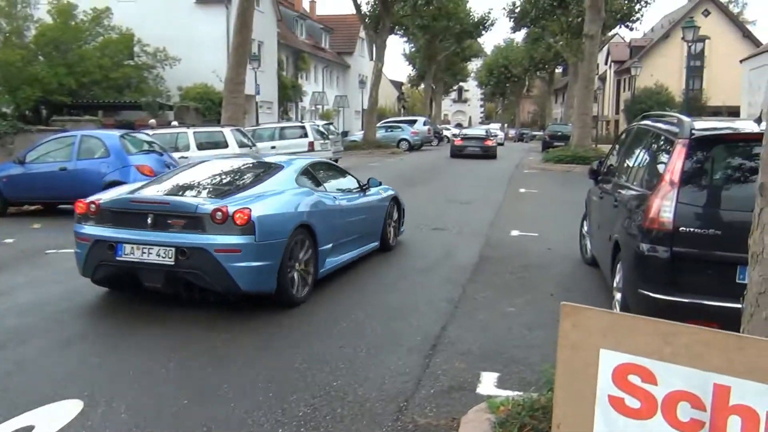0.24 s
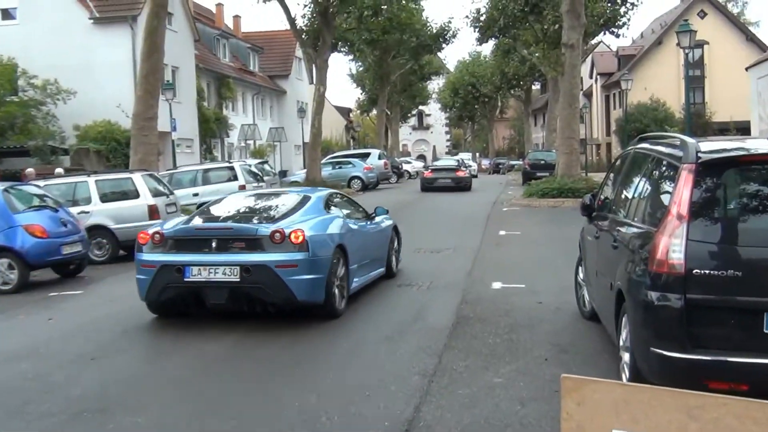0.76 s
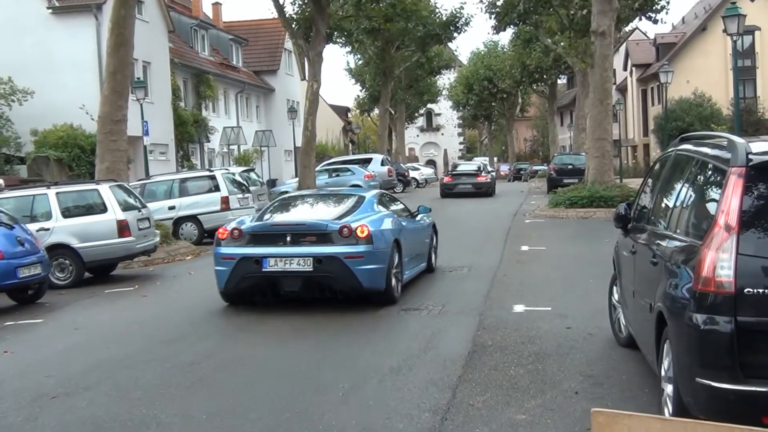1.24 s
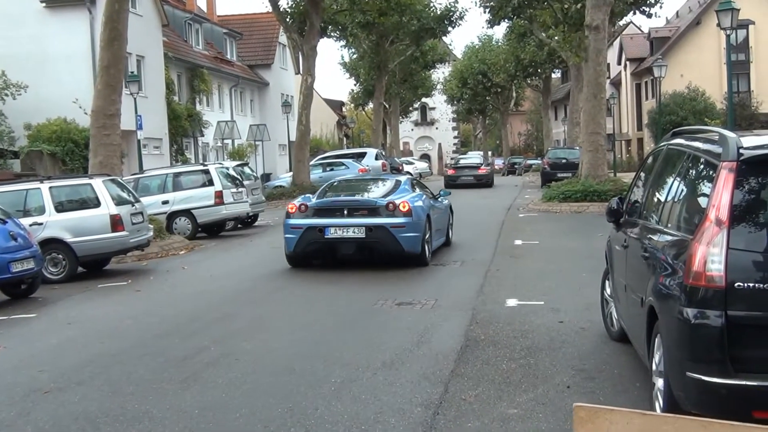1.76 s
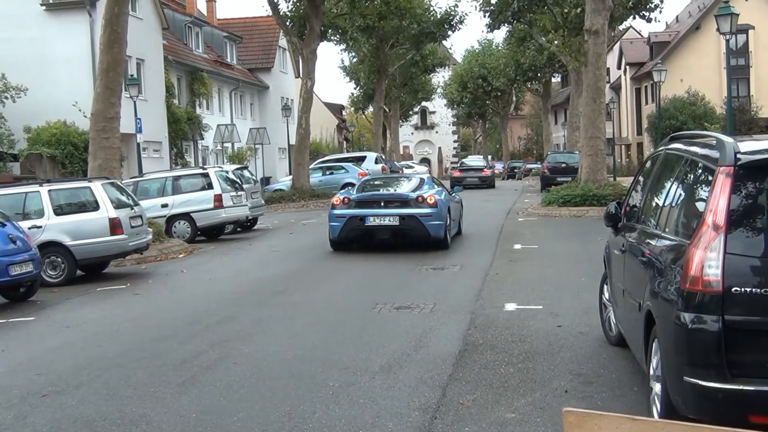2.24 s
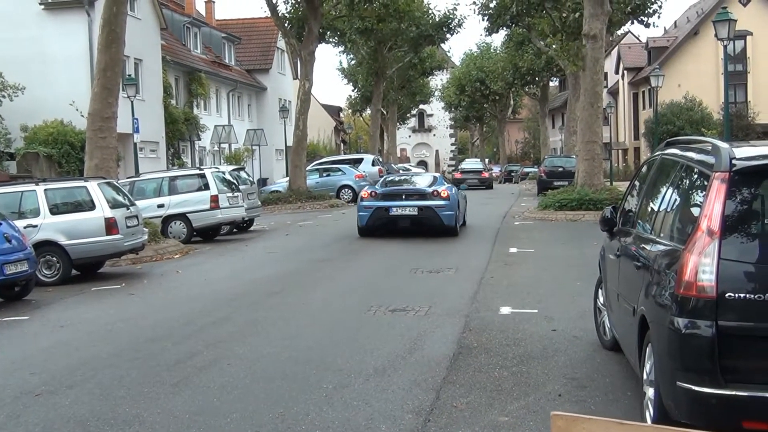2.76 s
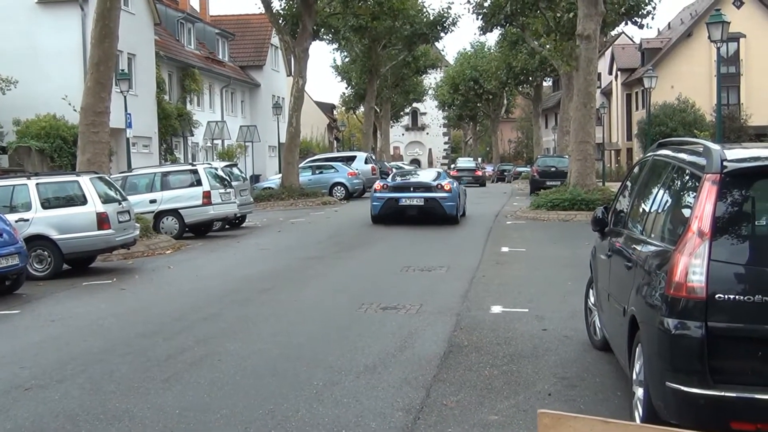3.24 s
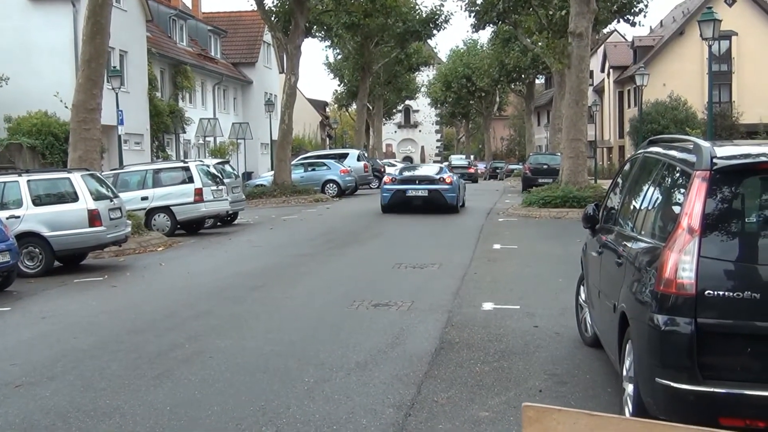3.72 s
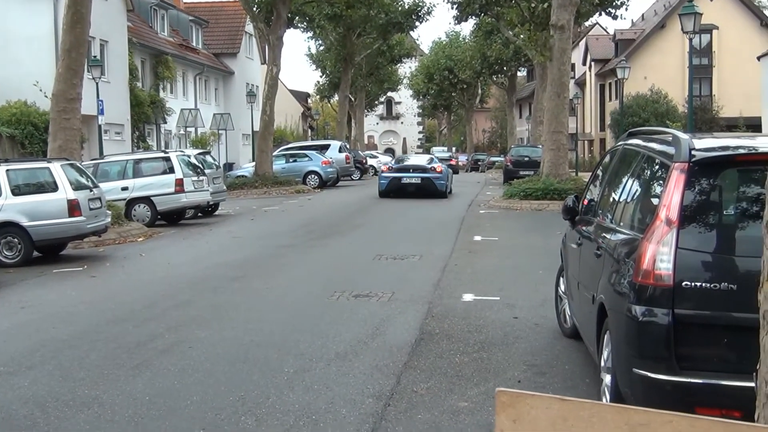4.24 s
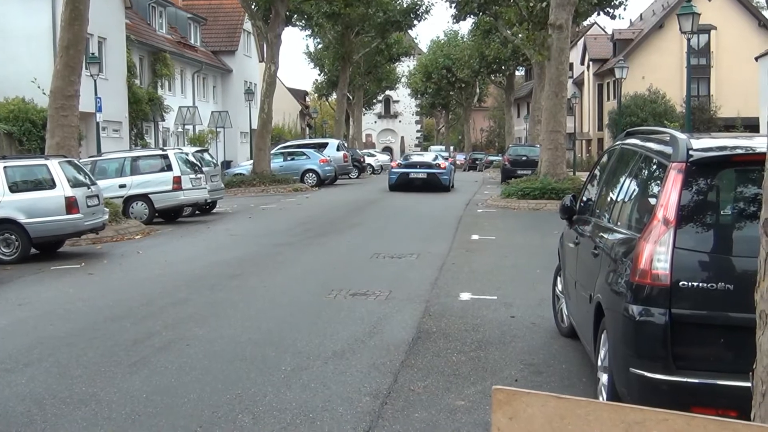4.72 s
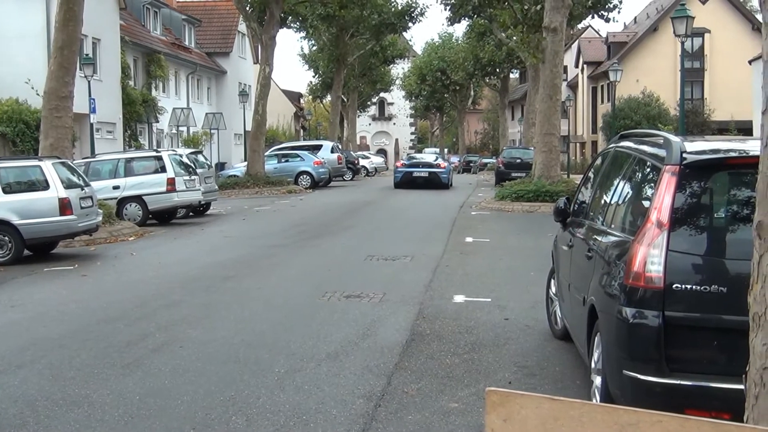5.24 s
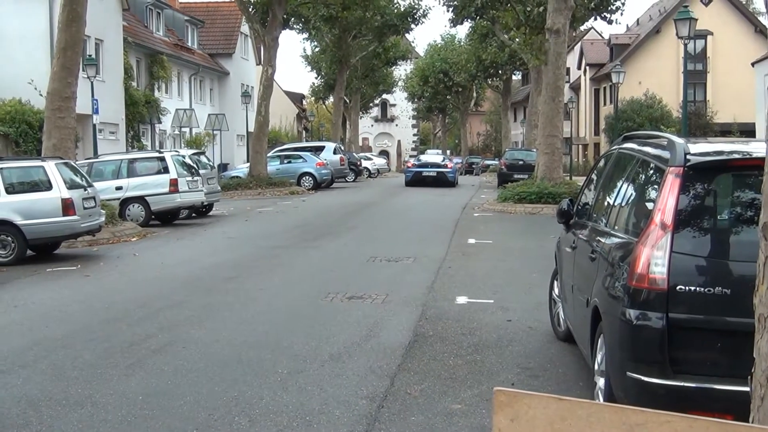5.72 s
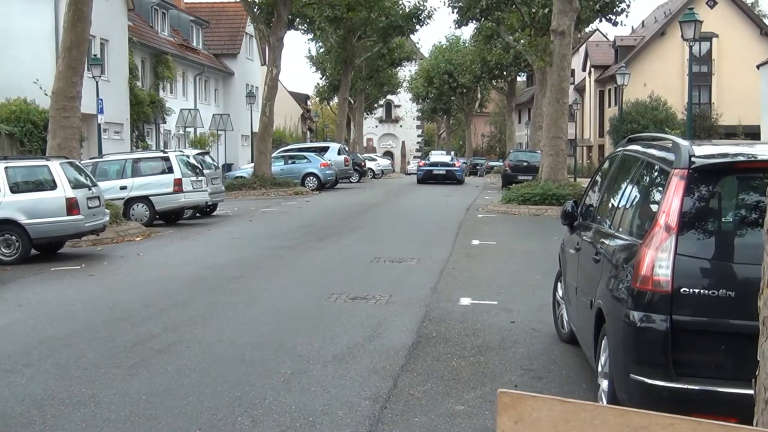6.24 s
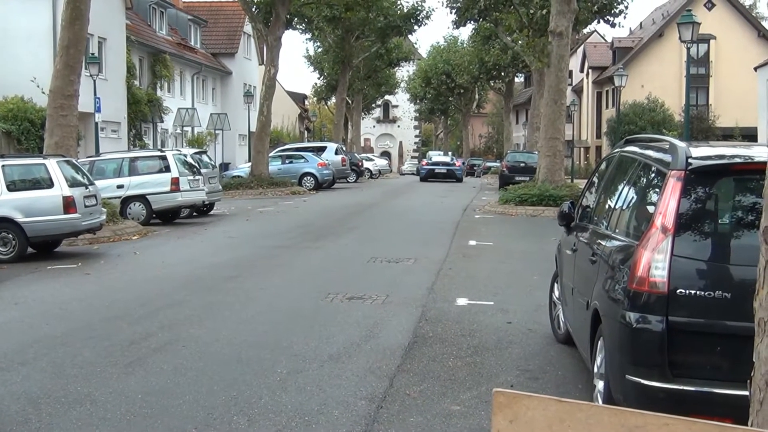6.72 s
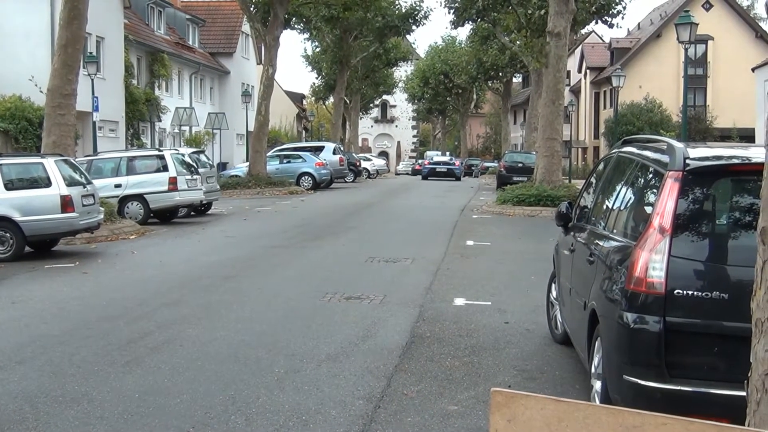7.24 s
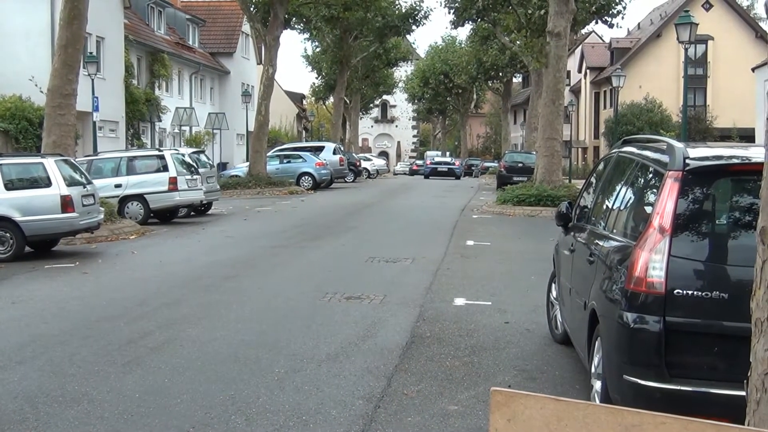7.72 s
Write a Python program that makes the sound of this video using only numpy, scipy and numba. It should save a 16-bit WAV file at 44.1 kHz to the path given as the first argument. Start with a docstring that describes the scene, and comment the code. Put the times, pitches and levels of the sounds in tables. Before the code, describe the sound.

A sports car pulls away down a street, its low engine growl rising, stumbling through a gear change, then climbing to a steady, popping drone.

```python
"""A sports car pulls away down a street while a second engine ahead revs and dies away, both sums of crank orders.
The car's orders rise, stumble through a gear change amid puffs of shaped noise, then climb to a steady drone.
Pipe pops, a swelling hum and a noise-fed resonance come and go; late on, gliding tones make a sparrow chirp.
Throughout, filtered noise gives tyre and traffic roar, and delay lines echo the engines off the house fronts."""
import sys
import numpy as np
from scipy import signal
from scipy.fft import rfft, irfft
from scipy.io import wavfile
from scipy.ndimage import uniform_filter1d
from numba import njit

SR = 44100
rng = np.random.default_rng(int(sys.argv[2]) if len(sys.argv) > 2 else 0)


def volts_from_decibels(level):
    """Turn decibel levels (scalar or array-like) into linear amplitude factors."""
    exponent = np.asarray(level, float) / 20
    return 10 ** exponent


def digitize_waveform(pressure):
    """Quantize a signal to 16-bit integers and store it at the path in sys.argv[1].

    Rows of a 2-D input are taken as channels; values are limited to [-1, 1].
    """
    field = np.atleast_2d(pressure).T
    bounded = np.clip(field, -1, 1)
    quanta = np.round(bounded * 32767).astype(np.int16)
    wavfile.write(sys.argv[1], SR, quanta)


N = 351918
TIME = np.arange(N) / SR

# The car's speed and load; the load drops and catches twice in the gear change:
# (time [s], crank frequency [Hz], load offset of order 2 [dB])
CAR_SPEED_LOAD = [(0, 60.26, 0.5), (.165, 61.33, 2), (.54, 62.42, .5), (1.04, 65.82, 0), (1.54, 69.92, 1),
                  (2.04, 74.44, 0.5), (2.54, 78, 0.5), (2.8, 76.24, 0), (2.83, 75.85, -4),
                  (2.878, 75.8, -5), (2.93, 66.05, -7), (2.996, 62.8, -10), (3.05, 55.5, -8.5),
                  (3.09, 57.2, -9), (3.154, 59.5, 1.5), (3.198, 58.15, -3.5), (3.252, 51.87, 4),
                  (3.308, 50.1, -10), (3.4, 50.9, -2), (3.5, 51.37, -2), (3.875, 52.85, 3),
                  (4.375, 55.46, -1), (5, 58.17, -1), (5.5, 60.07, -1), (6, 62.43, 1.5), (6.5, 63.9, -.5),
                  (6.9, 63.87, 1), (7.5, 63.22, -1), (7.98, 63.15, -2)]
# Level of each crank order against engine speed: (crank frequency [Hz], order 1 [dB], .., order 6 [dB])
ORDER_LEVELS = [(52.5, -49, -22.5, -20, -22.5, -46, -34.5), (52.6, -61, -25.5, -22, -23, -44, -37),
                (53.67, -55, -17.5, -34.5, -20, -45, -37), (56.3, -34.5, -10, -34, -23.5, -38, -33),
                (57.03, -33, -9, -19.5, -28, -46, -36), (59.13, -38.5, -17, -27, -23.5, -39, -35.5),
                (59.66, -30, -13.5, -16, -24.5, -30, -45), (61.3, -32, -13, -31, -32, -30, -37),
                (62.4, -37, -11.5, -35, -34.5, -27, -29.5), (65, -36, -10, -38.5, -33, -27.5, -28.5),
                (65.9, -34, -9, -28, -27, -25.5, -26.5), (68.4, -37.5, -10.5, -38, -25, -27, -28),
                (70.9, -31.5, -9, -32.5, -24.5, -25, -39.5), (72.8, -36, -8, -30, -23, -30, -40),
                (76.6, -30.5, -8.5, -24, -30.5, -33.5, -39), (78, -33, -8.5, -25, -30.5, -46, -30)]
# Orders other than the second while the clutch is open: {order: level [dB]}
OPEN_CLUTCH_LEVELS = {1: -44, 3: -25, 4: -29, 5: -40.5, 6: -36.5}
# Exhaust resonances that lift an upper order as it crosses them:
# (frequency [Hz], width [Hz], level over the upper orders' level [dB])
EXHAUST_RESONANCES = [(456.5, 18, 6), (609.7, 30, 0), (679.5, 20, -1.5), (741, 34, 0.5), (847.6, 30, -0.5),
                      (1000, 20, 0), (1136, 64, -3.5)]
# Loudest moments of single upper orders: (time [s], order, peak level [dB], length [s])
ORDER_SWELLS = [(.35, 12, -45, .44), (0.56, 10, -34.5, 0.14), (.921, 7, -39.5, .3), (1.08, 13, -34.5, 0.23),
                (2.4, 10, -42, 0.3), (2.447, 13, -43.5, 0.25), (2.706, 8, -41, 0.12), (2.734, 9, -39, .18),
                (2.742, 10, -39, 0.15), (3.456, 8, -37, .5), (4.408, 15, -38, 0.42),
                (4.784, 8, -33.5, 0.077), (5.33, 14, -28.5, 0.35), (5.756, 14, -38, 0.26),
                (6.194, 11, -39.5, .24), (7.597, 11, -38.5, 0.32)]
# Course of the broad layers: (time [s], upper orders [dB], road roar [dB], gas hiss [dB])
LAYER_LEVELS = [(0, -43, -34.5, -41.5), (.93, -46, -36.5, -45.5), (1.35, -48, -40.5, -50),
                (1.9, -47, -40.5, -51), (2.55, -53, -40.5, -52), (2.76, -46, -38, -51),
                (3.07, -49.5, -40.5, -52), (3.5, -53, -41.5, -53), (4.3, -45, -37, -51), (5, -46, -34, -54),
                (5.55, -41, -31, -56.5), (6.1, -41.5, -34.5, -65.5), (6.9, -43.5, -36, -58),
                (7.5, -43, -34, -61), (7.98, -40.5, -33.5, -56)]
# Shape of the gas hiss, scaled as a whole later: (frequency [Hz], relative density [dB per Hz])
HISS_SPECTRUM = [(1470, -29.5), (2500, -7.5), (2720, -6), (3030, 0.5), (3470, 3), (5530, -5.5),
                 (8680, -8.5), (15500, -31.5)]
# Dull exhaust pops: (time [s], peak level [dB], frequency [Hz])
EXHAUST_POPS = [(.471, -20, 905.5), (4.318, -16.5, 850), (4.362, -15, 799.3), (4.871, -13.5, 1078),
                (4.907, -12.5, 1047), (4.932, -16, 750), (5.534, -12, 1000), (5.572, -15, 1300),
                (5.601, -15, 903), (5.614, -14, 796), (5.675, -14, 854), (7.018, -10.5, 950),
                (7.034, -10.5, 950)]
# Gearbox air: (time [s], level before shaping [dB], centre [Hz], time to fall 60 dB [s])
AIR_PUFFS = [(2.825, -54, 8333, 0.087), (.76, -41.5, 5313, 0.34), (3.144, -45.5, 6000, 0.16),
             (3.158, -40, 3410, 0.35), (3.266, -52, 11100, .08), (3.324, -57, 10510, .04),
             (5.02, -63, 9370, 0.047)]
# The engine ahead revs and lifts off: (time [s], crank frequency [Hz], reference level [dB])
AHEAD_SPEED_LEVEL = [(0.03, 52.96, -20), (0.13, 54.8, -15.5), (0.33, 57, -16.5), (0.55, 61.3, -19.5),
                     (0.73, 60.75, -17.5), (0.93, 54.9, -25)]
# Its orders: {order: level beside the reference [dB]}
AHEAD_ORDER_LEVELS = {2: -7.5, 3: -12.5, 4: -1.5, 6: -16.5, 12: -19}
# Swelling hum: (peak time [s], length [s], frequency [Hz], level [dB], fourth multiple [dB])
HUM_SWELLS = [(3.8, .9, 68.5, -30, -48.5), (7.748, .7, 67.9, -28, -29.5)]
# Shape of the road roar, scaled as a whole later: (frequency [Hz], relative density [dB per Hz])
ROAR_SPECTRUM = [(30, -45), (45, -28.5), (70, -15.5), (100, -17), (160, -10.5), (250, -14), (400, -17),
                 (540, -25), (800, -23), (1300, -26.5), (2100, -30), (4000, -45), (8500, -57),
                 (15000, -78.5)]
# Tailpipe resonances in the gas noise: (frequency [Hz], width [Hz], gain [dB])
TAILPIPE_RESONANCES = [(659, 88, 1), (855, 37, -5), (390.6, 21, -0.5), (950, 99, -4)]
# Course of the narrow drone, before a fixed trim: (time [s], level [dB])
DRONE_LEVELS = [(0.0, -38), (0.66, -31.5), (0.93, -28), (1.38, -49.5), (2.78, -28.5), (3.11, -50),
                (3.2, -36), (3.73, -41.5), (3.93, -32), (4.02, -39), (4.82, -29.5), (4.89, -51),
                (4.95, -29), (5.51, -44), (5.91, -17.5), (6.07, -33.5), (7.2, -36), (7.42, -21.5),
                (7.56, -42), (7.98, -46)]
# Sparrow: (time [s], level before the burr [dB], start pitch [Hz], end pitch [Hz], length [s])
SPARROW_CHIRPS = [(6.499, -41.5, 5413, 4287, 0.074), (7.009, -46, 4800, 4540, 0.049),
                  (7.449, -43, 4234, 4594, 0.08)]


def columns(table):
    """Linear interpolation gives every column a value per sample."""
    s, *values = np.transpose(table)
    return [np.interp(TIME, s, v) for v in values]


def unit(x):
    """Normalisation by the root mean square: rms becomes 1."""
    return x / np.sqrt(np.mean(x ** 2))


def band(x, hz, width):
    """Two-pole resonance with gain 1 at its centre."""
    return signal.lfilter(*signal.iirpeak(min(hz, 18000), hz / width, fs=SR), x)


def walk(rate):
    """Smoothed random process: levels held 1 / rate s and slewed twice, spread near 1."""
    hold = int(SR / rate)
    steps = np.repeat(rng.standard_normal(N // hold + 1), hold)
    return 1.17 * uniform_filter1d(uniform_filter1d(steps, hold), hold)[:N]


def noise(spectrum, flicker_db):
    """Spectral shaping of white noise, its overlapping octave bands each flickering alone."""
    hz, db = np.transpose(spectrum)
    bins = np.arange(N // 2 + 1) * SR / N + 1
    shape_db = np.interp(np.log(bins), np.log(hz), db, left=-90, right=-120)
    shaped = rfft(rng.standard_normal(N)) * volts_from_decibels(shape_db)
    out = 0
    for octave in np.arange(5, 15):  # centres at 2 ** octave Hz
        share = np.cos(np.pi / 2 * np.clip(np.log2(bins) - octave, -1, 1)) ** 2
        out = out + volts_from_decibels(flicker_db * walk(14)) * irfft(shaped * share, N)
    return out


def orders(hz, multiples, dbs, waver_db, jitter):
    """Additive synthesis by crank order; uneven firing shakes level and phase, more phase in high orders."""
    turn = 2 * np.pi * np.cumsum(hz) / SR
    out = 0
    for k, db in zip(multiples, dbs):
        level = np.sqrt(2) * volts_from_decibels(db + waver_db * walk(25))  # db is an rms level
        phase = k * turn + rng.uniform(0, 2 * np.pi) + jitter * k * walk(30)
        out = out + level * np.sin(phase)
    return out


def low_orders(hz, load_db, stumble):
    """Forced vibration: engine speed sets six low orders, load shifts the second, an open clutch the rest."""
    speed_hz, *maps = np.transpose(ORDER_LEVELS)
    dbs = []
    for k, level_db in enumerate(maps, start=1):
        db = np.interp(hz, speed_hz, level_db)
        if k == 2:
            db = db + load_db
        else:
            db = (1 - stumble) * db + stumble * OPEN_CLUTCH_LEVELS[k]
            db = db + (1.4 + 2 * stumble) * walk(16)
        if k in (3, 5):
            db = db - 0.5 * (TIME - 3)  # thins by 0.5 dB per s as the car draws away
        dbs.append(db)
    return orders(hz, range(1, 7), dbs, waver_db=.5 + 1.5 * stumble, jitter=.01 + .2 * stumble)


def upper_orders(hz, upper_db, stumble):
    """Resonant excitation: orders 7 to 18 swell as they cross exhaust resonances and at moments of their own."""
    dbs = []
    for order in range(7, 19):
        lift = sum(volts_from_decibels(db) / (1 + (2 * (order * hz - ring_hz) / width) ** 2)
                   for ring_hz, width, db in EXHAUST_RESONANCES)
        gain = volts_from_decibels(upper_db + 3.63 * walk(2.515)) * (volts_from_decibels(-1.6 * (order - 5.5)) + lift)
        for s, ringing_order, db, length in ORDER_SWELLS:
            if round(ringing_order) == order:
                gain = gain + volts_from_decibels(db) * np.exp(-2 * ((TIME - s) / length) ** 2)
        dbs.append(20 * np.log10(gain))
    # the further the sound travels, the more the air and the echoes fray it
    return orders(hz, range(7, 19), dbs, waver_db=1 + .3 * TIME, jitter=.01 + .007 * TIME + .1 * stumble)


def sports_car(upper_db, hiss_db):
    """Harmonic superposition of crank orders, with gas noise amplitude-modulated twice per crank turn."""
    hz, load_db = columns(CAR_SPEED_LOAD)
    # firings stumble while the clutch is open
    stumble = np.exp(-((TIME - 3.05) / 0.31) ** 4)
    low = low_orders(hz, load_db, stumble)
    upper = upper_orders(hz, upper_db, stumble)
    beat = 1 + 0.041 * np.sin(2 * 2 * np.pi * np.cumsum(hz) / SR)
    hiss = volts_from_decibels(hiss_db) * unit(beat * noise(HISS_SPECTRUM, flicker_db=.4))
    return low + upper + hiss


def pops():
    """Damped free oscillation: a sudden pressure step rings the pipe end for a few cycles."""
    out = np.zeros(N)
    t = TIME[:SR // 10]
    t60_s, attack_s = .013, 0.00048
    envelope = np.exp(-np.log(1000) * t / t60_s) * np.minimum(t / attack_s, 1)
    for s, db, hz in EXHAUST_POPS:
        ring = np.sin(2 * np.pi * hz * t) * envelope
        out[int(s * SR):int(s * SR) + len(t)] += volts_from_decibels(db) * ring / np.abs(ring).max()
    return out


def puffs():
    """Turbulent jet noise: air escapes in a rush and decays exponentially."""
    out = np.zeros(N)
    t = TIME[:SR // 3]
    attack_s = 0.0032
    for s, db, hz, t60 in AIR_PUFFS:
        width = 0.67 * hz
        burst = unit(band(band(rng.standard_normal(len(t)), hz, width), hz, width))
        # distance takes the very top
        burst = signal.sosfilt(signal.butter(2, 13000, fs=SR, output="sos"), burst)
        burst = burst * np.minimum(t / attack_s, 1) * np.exp(-np.log(1000) * t / t60)
        out[int(s * SR):int(s * SR) + len(t)] += volts_from_decibels(db) * burst
    return out


def engine_ahead():
    """Harmonic superposition: crank orders follow one rev and fade once the engine lifts off."""
    hz, db = columns(AHEAD_SPEED_LEVEL)
    fade = np.clip((AHEAD_SPEED_LEVEL[-1][0] + 0.084 - TIME) / 0.05, 0, 1)
    dbs = [db + beside_db + (k != 4) * 2.5 * walk(8) for k, beside_db in AHEAD_ORDER_LEVELS.items()]
    return fade * orders(hz, AHEAD_ORDER_LEVELS, dbs, waver_db=1, jitter=.02)


def humming_engine():
    out = 0
    for s, length, hz, *dbs in HUM_SWELLS:
        swell = np.exp(-2 * ((TIME - s) / length) ** 2)
        out = out + swell * orders(np.full(N, hz), (1, 4), dbs, waver_db=1.5, jitter=0.054)
    return out


def road(db):
    """Broadband turbulence of tyres, traffic and gas throbs with the firings, resonates in pipes and crackles."""
    roar = noise(ROAR_SPECTRUM, flicker_db=.6) * volts_from_decibels(.6 * walk(16))
    # the level refers to a wide band around 1975 Hz
    roar = roar / np.std(band(roar, 1975, 1800))
    crank_hz = columns(CAR_SPEED_LOAD)[0]
    roar = roar * (1 + 0.13 * np.sin(2 * 2 * np.pi * np.cumsum(crank_hz) / SR))
    hum = sum(volts_from_decibels(pipe_db + 0.78 * walk(5.9)) * band(roar, hz, width)
              for hz, width, pipe_db in TAILPIPE_RESONANCES)
    happens, loudness = rng.random((N, 2)).T
    # about 150 small pops a second, a few louder than the rest
    clicks = (happens < 150 / SR) * volts_from_decibels(-2.5 * np.log(loudness + 1e-9))
    crackle = unit(band(band(clicks, 950, 560), 950, 560))
    return volts_from_decibels(db) * (roar + hum + volts_from_decibels(-13) * crackle)


def drone():
    """Sustained resonance: gas noise keeps a narrow fixed resonance ringing."""
    ringing = unit(band(band(rng.standard_normal(N), 457.5, 11), 458.4, 12))
    return volts_from_decibels(columns(DRONE_LEVELS)[0] - 2.5) * ringing


def sparrow():
    """Frequency and amplitude modulation: short gliding whistles flutter in pitch and burr in level."""
    out = np.zeros(N)
    flutter, burr = walk(300), walk(900)
    for s, db, start_hz, end_hz, length in SPARROW_CHIRPS:
        u = np.linspace(0, 1, int(length * SR))
        span = slice(int(s * SR), int(s * SR) + len(u))
        hz = start_hz + (end_hz - start_hz) * u + 200 * flutter[span]
        tone = np.sin(2 * np.pi * np.cumsum(hz) / SR)
        out[span] += volts_from_decibels(db) * burr[span] * np.sin(np.pi * u) * tone
    return out


def whistle(hiss_db):
    """Narrow-band filtering of noise: a faint thin band follows the hiss 20 dB below."""
    return volts_from_decibels(hiss_db - 20.0) * unit(band(rng.standard_normal(N), 8600, 150))


@njit
def walls(x, lags, gain, damp):
    """Multiple reflection: eight delay lines feed each other, duller on every round."""
    line, soft, out = np.zeros((8, 8192)), np.zeros(8), np.zeros(len(x))
    for i in range(len(x)):
        total = 0.
        for k in range(8):
            # & 8191 wraps round the circular buffer
            soft[k] += (1 - damp) * (gain[k] * line[k, (i - lags[k]) & 8191] - soft[k])
            total += soft[k]
        out[i] = total
        for k in range(8):
            line[k, i & 8191] = x[i] + soft[k] - total / 4
    return out


def street_echo(near):
    """Reverberation: house fronts return the near sources, each lag losing its share of the 60 dB decay."""
    t60_s, damp, echo_db = 0.65, 0.5, -28.5
    lags = rng.integers(900, 3500, 8)  # samples
    return volts_from_decibels(echo_db) * walls(near, lags, volts_from_decibels(-60 * lags / SR / t60_s), damp)


def scene():
    """Linear superposition of all sources and the street's echo of the near ones."""
    upper_db, roar_db, hiss_db = columns(LAYER_LEVELS)
    car = sports_car(upper_db, hiss_db) + pops() + puffs()
    near = car + engine_ahead() + humming_engine() + sparrow()
    background = road(roar_db) + drone() + whistle(hiss_db)
    return (near + street_echo(near) + background)[None]


def roll_off(x):
    """The treble ends steeply here."""
    return signal.sosfilt(signal.butter(12, 16310, fs=SR, output="sos"), x)


def record(dry):
    """Transduction by a microphone: it adds bright hiss, cuts deep bass and saturates on loud peaks."""
    # differencing tilts the noise towards the treble
    self_noise = volts_from_decibels(-82.5) * np.diff(rng.standard_normal(N + 1))
    mix = signal.sosfilt(signal.butter(4, 42, "high", fs=SR, output="sos"), dry + self_noise)
    mix = mix / (1 + np.abs(mix / 1.1) ** 4) ** (1 / 4)
    return roll_off(mix)


dry = scene()
out = record(dry)
digitize_waveform(out)
```